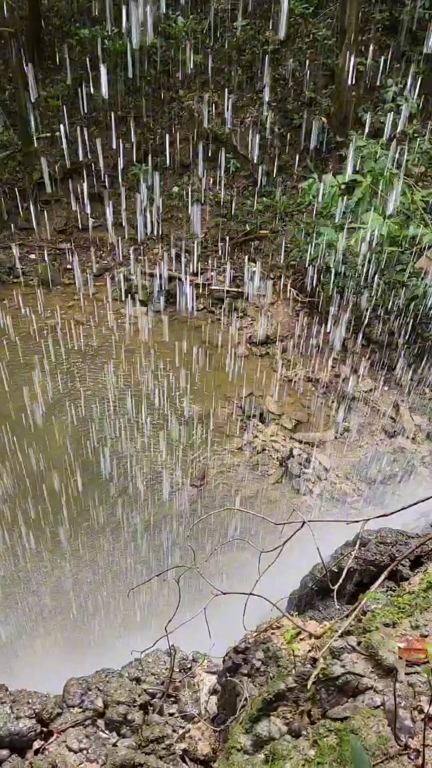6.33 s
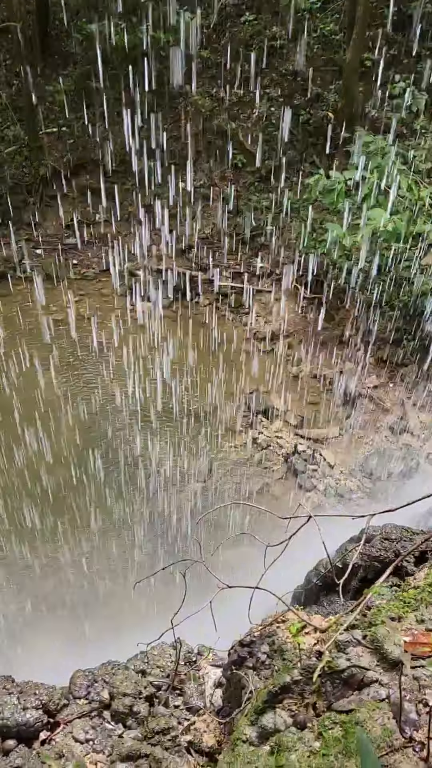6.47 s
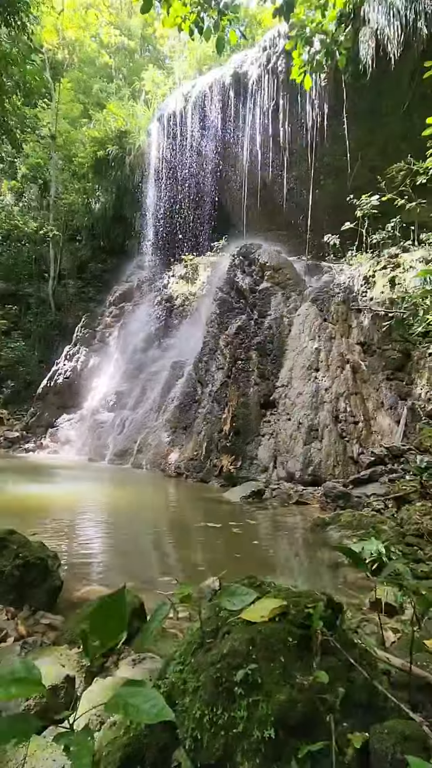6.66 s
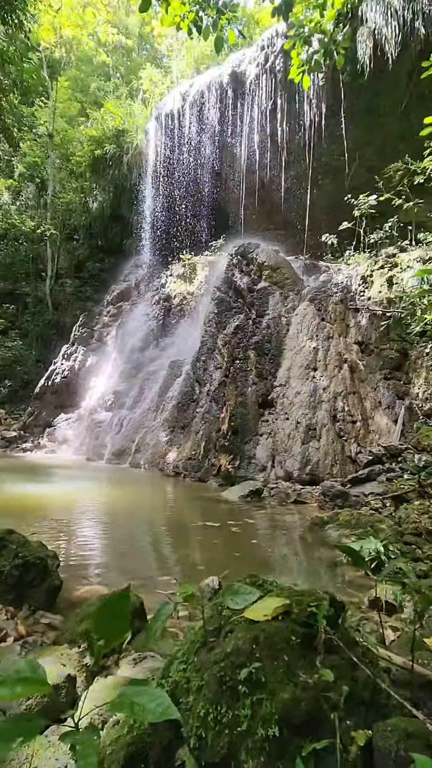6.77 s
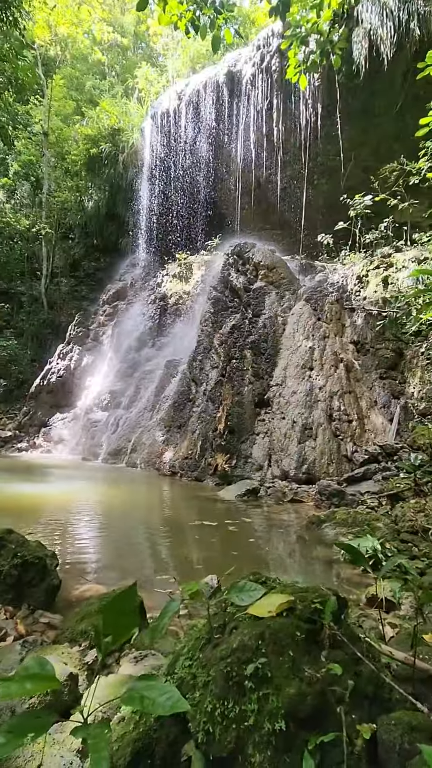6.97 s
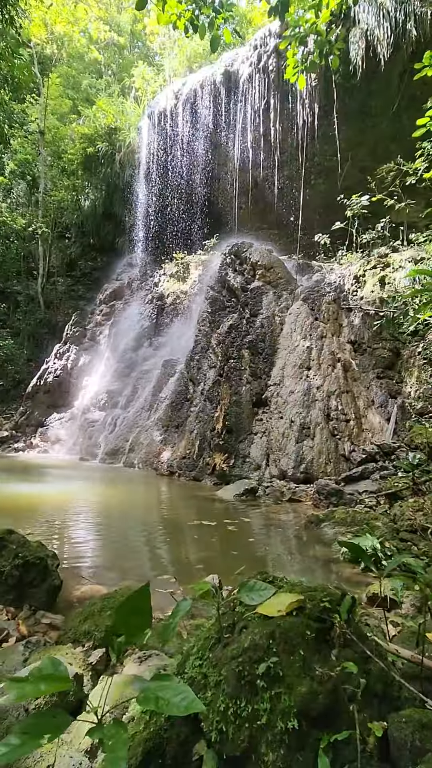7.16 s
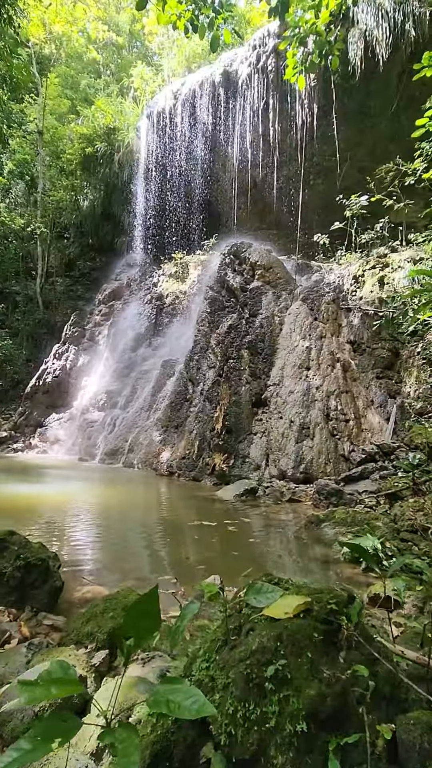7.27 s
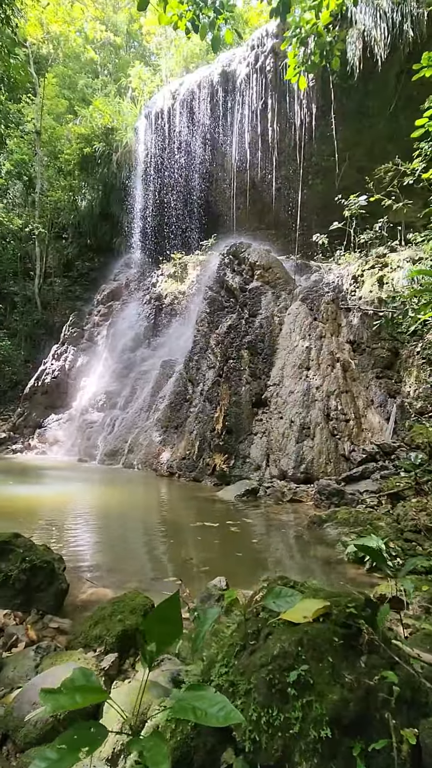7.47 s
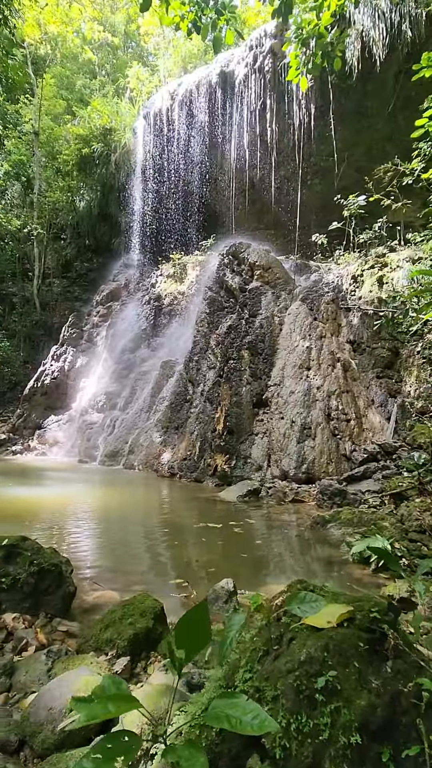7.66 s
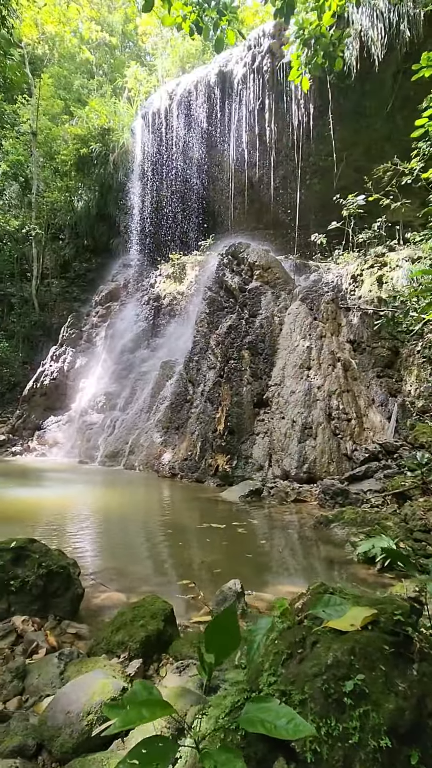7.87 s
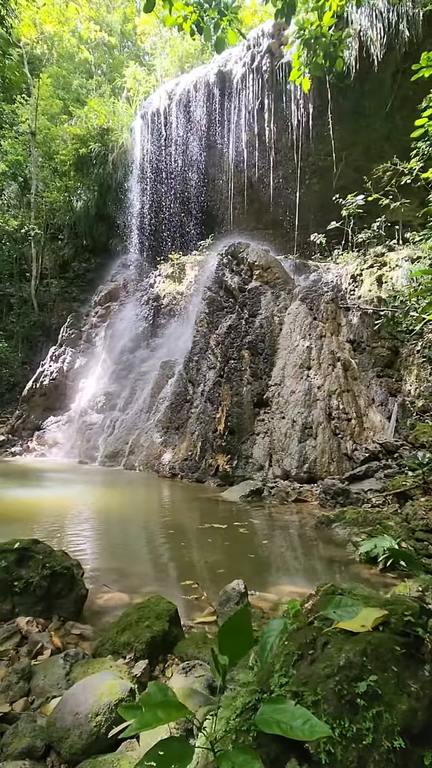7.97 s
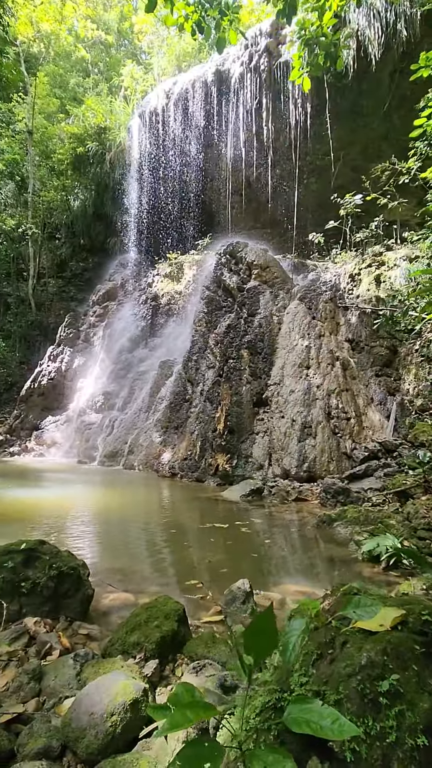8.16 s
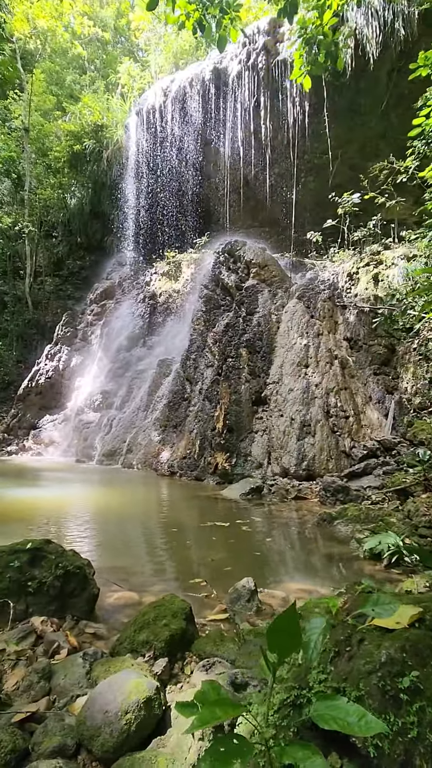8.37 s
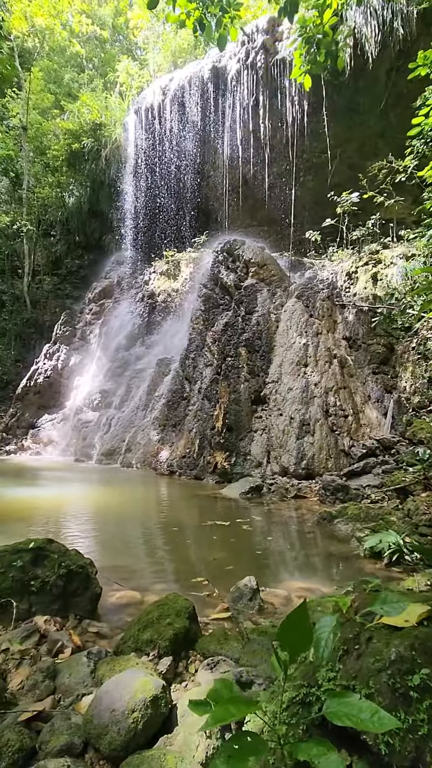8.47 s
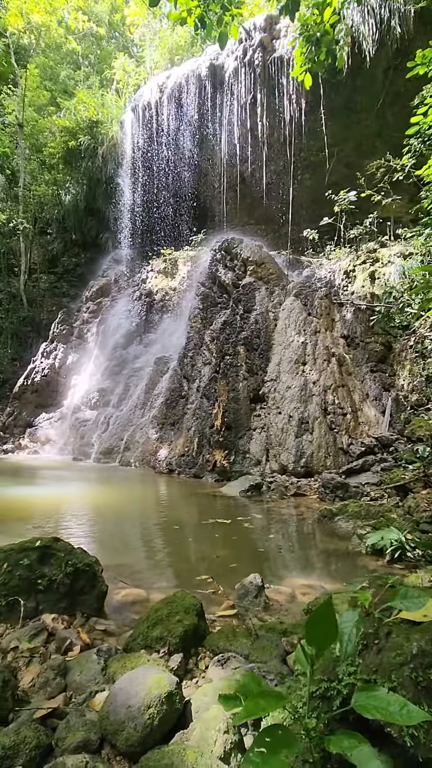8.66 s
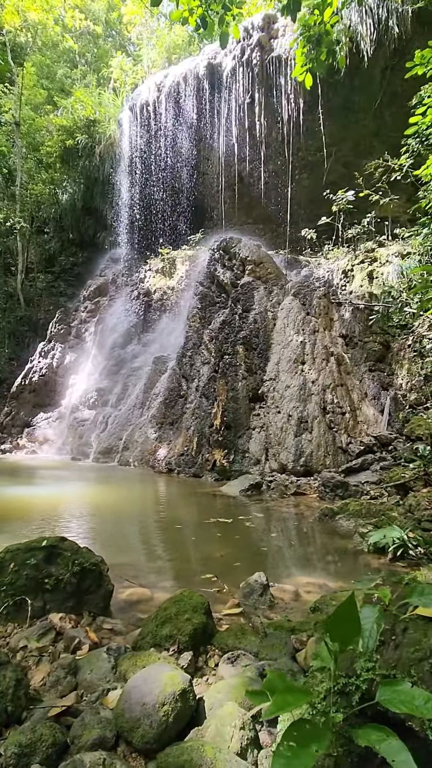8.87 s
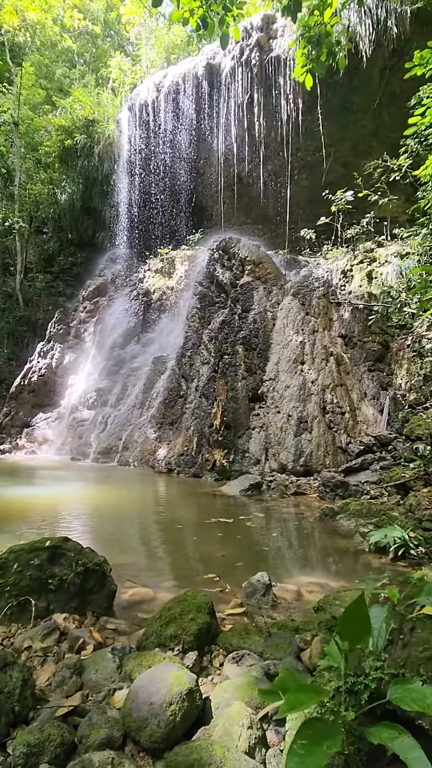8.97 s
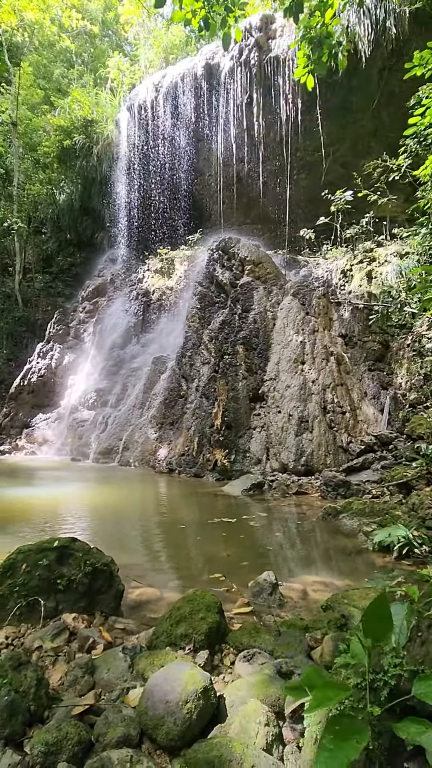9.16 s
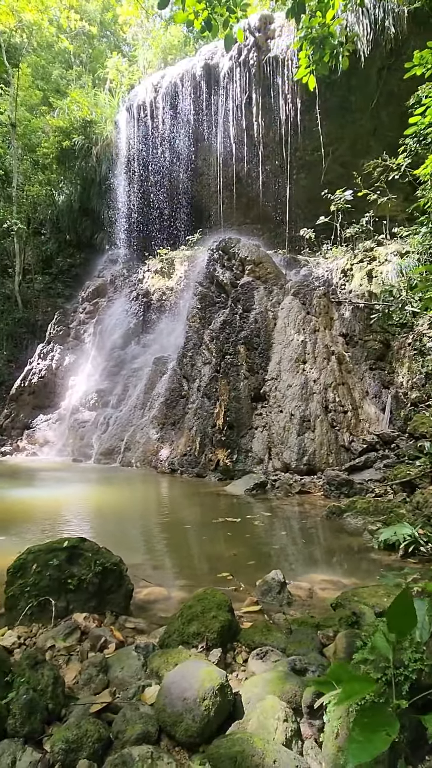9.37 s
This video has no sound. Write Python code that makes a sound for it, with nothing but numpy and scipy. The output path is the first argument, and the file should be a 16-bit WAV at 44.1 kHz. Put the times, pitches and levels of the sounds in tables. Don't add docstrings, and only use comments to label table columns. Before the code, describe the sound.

Outdoor stereo microphone right beside a thin waterfall: steady crackling spray, a thick strand pouring into the pool, random sharp drop impacts, and soft low wind buffeting. The stereo image shifts slowly as the microphone turns early on. Near the end an abrupt cut leaves a tenth of a second of silence, followed by the same fall from across the pool, softer, even and without distinct drops.

```python
import sys
import numpy as np
from scipy import signal
from scipy.fft import rfft, irfft, next_fast_len
from scipy.io import wavfile
from scipy.ndimage import map_coordinates

SR = 44100
rng = np.random.default_rng(int(sys.argv[2]) if len(sys.argv) > 2 else 0)


def dump(signal):
    limited = np.clip(np.atleast_2d(signal).T, -1, 1)
    pcm = np.round(limited * 32767).astype(np.int16)
    wavfile.write(sys.argv[1], SR, pcm)


def decibels_to_gain(level_db):
    exponent = np.asarray(level_db, float) / 20
    return 10 ** exponent


N = 414981
TIME_S = np.arange(N) / SR

# (time [s], level [dB])
NEAR_FLOW = [(0.0, -22), (0.11, -24), (0.6, -22.5), (0.73, -25), (0.9, -22), (3.09, -24), (3.27, -22.5),
             (4.01, -23), (4.67, -22), (5.68, -23.5), (6.32, -22.5), (6.6, -23.5)]
# (time [s], level [dB])
FAR_FLOW = [
    (6.78, -40),
    (7.16, -40),
    (7.57, -40),
    (8.8, -40),
    (9.35, -40),
]
# (frequency [Hz], left-right correlation [-1..1])
NEAR_LIKENESS = [(60, 0.99), (130, 1), (290, 0.94), (640, 0.69), (1410, -0.073), (3100, -0.38),
                 (6820, 0.28), (15000, -0.2)]
# (frequency [Hz], left-right correlation [-1..1])
FAR_LIKENESS = [(60, 1), (130, 1), (290, 0.9), (640, 0.75), (1410, 0.29), (3100, -0.01), (6820, -0.09),
                (15000, 0.07)]
# (frequency [Hz], left density [dB per Hz], right density [dB per Hz])
ROAR_EARLY = [(30, -78, -87), (45, -83, -84), (100, -78, -78.5), (148, -72, -72), (260, -72, -73),
              (400, -71.5, -70.5), (580, -73.5, -75), (720, -72, -73), (1010, -73, -68)]
# (frequency [Hz], left density [dB per Hz], right density [dB per Hz])
HISS_EARLY = [(1420, -70.5, -65), (2220, -66, -62.5), (2900, -66.5, -65), (4030, -64, -62),
              (4700, -68, -53.5), (6200, -66, -51.5), (7540, -59, -51.5), (8100, -67, -58.5),
              (8800, -74, -71.5), (11000, -67, -72), (11800, -66, -59), (13100, -63.5, -59.5),
              (14600, -60.5, -70), (15500, -62, -66)]
# (frequency [Hz], left density [dB per Hz], right density [dB per Hz])
ROAR_LATE = [(29.8, -75, -79), (45, -81, -75), (100, -73.5, -74), (150, -71.5, -72.5), (260, -72, -70.5),
             (418, -71.5, -70.5), (595, -73.5, -72.5), (720, -69, -70.5), (990, -70.5, -69.5)]
# (frequency [Hz], left density [dB per Hz], right density [dB per Hz])
HISS_LATE = [(1420, -68, -64.0), (2270, -67.5, -64.5), (2930, -64, -68.5), (3860, -65.5, -62),
             (5050, -61.5, -53), (6940, -61.5, -51.5), (7560, -57.5, -47.5), (8190, -67, -57.5),
             (9050, -67.5, -73), (11000, -64.5, -72), (11780, -65, -59.5), (13240, -57, -57.5),
             (14600, -61.5, -63.5), (15600, -59.5, -70)]
# (frequency [Hz], left density [dB per Hz], right density [dB per Hz])
ROAR_FAR = [(29.8, -87, -98), (45, -88, -82), (99, -76, -76), (146, -78.0, -78.5), (263, -84.5, -84),
            (453, -79.5, -78.5), (590, -74.5, -77), (720, -77.5, -76), (1000, -75, -75)]
# (frequency [Hz], left density [dB per Hz], right density [dB per Hz])
HISS_FAR = [(1530, -71.5, -70.5), (2150, -69.5, -68.5), (2750, -70.0, -73), (3740, -71, -70.5),
            (4850, -68.0, -65), (6500, -65.5, -64), (7700, -66.5, -60.5), (8120, -70, -66.5),
            (8800, -76, -82), (11100, -73.5, -79), (11760, -69, -71.5), (13100, -68.5, -68),
            (14600, -72, -70), (15600, -67, -80)]
# (time [s], lag of left port [ms])
STRAND_LAG = [
    (0, 0.33),
    (1, 0.33),
    (2, 0.31),
    (3, 0.1),
    (4.5, 0.027),
    (6.6, 0.063),
]
# (time [s], level re hiss [dB], left-right [dB], centre [Hz])
DROPS = [(0.052, 5, 6, 4700), (0.2322, 8, -2, 2000), (0.3927, 5, -2, 2600), (0.409, 4, 0, 1800),
         (0.4744, 6.5, -1, 1900), (0.5961, 4, 0, 4200), (0.7804, 3, -5, 3000), (0.9863, 7, 2, 2900),
         (1.1851, 5, -1, 3100), (1.2129, 8, 0, 2600), (1.4302, 4, -2, 3700), (1.7362, 4.5, 1, 2500),
         (1.8219, 5, -2, 3300), (2.1036, 7, -2, 2600), (2.4008, 6.5, 3, 2500), (3.4247, 7, 6, 5100),
         (3.8624, 4, 4, 2500), (4.2071, 7, 6, 2300), (4.2517, 4.5, 3, 9600), (4.526, 8.5, 5, 3200),
         (4.6795, 3, 6, 3700), (4.808, 3.5, 5, 2700), (5.143, 4.5, 3, 2700), (5.2101, 7, 6, 5000),
         (5.4787, 5, 2, 1800), (5.514, 5, 2, 6700), (5.9363, 6, 4, 6700), (6.0134, 5, 4, 2900),
         (6.1625, 4.5, 1, 2200), (6.5349, 4, 4, 2100)]
# (time [s], peak [dB], left-right [dB])
CRACKS = [(0.048, -23, -3), (0.4303, -6, -13), (0.504, -12.5, -17), (0.561, -19, -9.5), (0.9365, -14, -13),
          (1.2378, -6, -10), (1.288, -11, -6), (1.4282, -12, 1), (1.465, -9, 1), (1.5773, -5.5, 1),
          (1.821, -12, -7), (1.899, -9, -6), (2.0366, -20, -12.0), (2.0609, -4, -9), (2.374, -8.5, -14),
          (2.8846, -20, -8), (3.121, -9, -10), (3.2919, -6.5, -5), (3.423, -14, -21), (3.5588, -10, -11),
          (3.8557, -8, -6), (4.5035, -12, -9), (4.807, -8, -8), (4.93, -5, -4), (5.194, -16, -8),
          (5.209, -21, 1), (5.514, -20, -3), (6.1843, -6, -6), (6.2944, -12, -10), (6.5121, -13, 0)]
# (time [s], peak [dB])
GUSTS = [(0.08, -52), (0.37, -53), (0.72, -55), (0.94, -50), (1.85, -49), (2.38, -53), (2.5, -52),
         (2.64, -50), (2.92, -45.5), (3.22, -47), (3.62, -48), (4.45, -53), (4.93, -47), (5.08, -51),
         (5.34, -51), (5.97, -51), (7.81, -55), (8.15, -54)]

TURN_S = (1.4, 3.04)
NEAR_ENDS_S, FAR_STARTS_S = 6.6045, 6.7036
SURGES_PER_S, SPLASH_FOLLOWS = 2.35, .3
CRACK_OVER_HISS_DB, PORT_BIAS_DB = 10.5, -7
STRAY_DROPS, STRAY_DB, STRAY_HZ = 40, 2, (2000, 5500)
STRAY_PAN_DB, PAN_SPREAD_DB = (-4, 3.5), 2.5
LAG_MS, LAG_SPREAD_MS = (.2, -.4), .35
CALM_DB, GUST_RISE_DB_PER_S, GUST_FALL_DB_PER_S = -63, 112, 110


def rms_one(x):
    return x / np.sqrt(np.mean(x ** 2) + 1e-20)


def in_time(rows):
    time_s, *columns = np.transpose(rows)
    return [np.interp(TIME_S, time_s, column) for column in columns]


def at_hz(rows, hz, column=1):
    rows = np.array(rows)
    return np.interp(np.log(hz + 1), np.log(rows[:, 0]), rows[:, column])


def drift(rate_hz):
    pole = np.exp(-80 * np.pi * rate_hz / SR)
    noise = rng.standard_normal(N // 40 + 2002)
    slow = signal.lfilter([1], [1, -2 * pole, pole * pole], noise)[2000:]
    return np.interp(np.arange(N) / 40, np.arange(len(slow)), rms_one(slow))


def rush(likeness):
    size = next_fast_len(N)
    mid, side = rfft(rng.standard_normal((2, N)), size)
    alike = np.clip(at_hz(likeness, np.linspace(0, SR / 2, len(mid))), -1, 1)
    pair = np.sqrt(1 + alike) * mid + np.sqrt(1 - alike) * side * [[1], [-1]]
    return irfft(pair, size)[:, :N] * np.sqrt(.5)


def strand(low_hz, high_hz):
    pour = rng.standard_normal(N) * decibels_to_gain(2.75 * drift(30))
    pour = signal.sosfilt(signal.butter(1, [low_hz, high_hz], "band", fs=SR, output="sos"), pour)
    read_at = np.arange(N) - in_time(STRAND_LAG)[0] * SR / 1000
    left = map_coordinates(pour, [read_at], order=1, mode="nearest")
    return np.array([left, pour])


def splat(hz, octaves, t60_s, noise):
    edges_hz = np.clip(hz * 2 ** (np.array([-.5, .5]) * octaves), 300, 19000)
    fall = decibels_to_gain(-60 * np.arange(noise.shape[-1]) / SR / t60_s)
    puff = signal.sosfilt(signal.butter(2, edges_hz, "band", fs=SR, output="sos"), noise * fall)
    return puff * np.sqrt(np.sum(fall ** 2) / np.sum(puff ** 2, axis=-1, keepdims=True))


def patter(per_s, spread_db, clump_db, turns, octaves):
    sizes = decibels_to_gain(spread_db * np.minimum(rng.exponential(1, N), 3.2))
    chance = per_s * decibels_to_gain(clump_db * drift(14)) / SR
    landed = sizes * (rng.random(N) < chance)
    spot = rng.integers(0, 12, N)
    size = next_fast_len(N + 900)
    spectrum = 0
    for k, hz in enumerate(np.geomspace(1200, 13000, 12)):
        lag, pan_db = int(rng.uniform(0, 40)), rng.normal(0, 1.97)
        sound = splat(hz, octaves, 0.0025 + turns / hz, rng.standard_normal((2, 900)))
        sound = sound * decibels_to_gain([[pan_db], [-pan_db]])
        sound[k % 2] = np.r_[np.zeros(lag), sound[k % 2, :900 - lag]]
        spectrum = spectrum + rfft(landed * (spot == k), size) * rfft(sound, size) * np.sqrt(hz / 4000)
    return rms_one(irfft(spectrum, size)[:, :N])


def surging(water, flow, surge_db, during):
    spray_db = in_time(flow)[0]
    spray_db = spray_db - spray_db[during].mean() + surge_db * drift(SURGES_PER_S)
    splash_db = (SPLASH_FOLLOWS - 1) * spray_db + surge_db * drift(SURGES_PER_S)
    splash = signal.sosfilt(signal.butter(1, 3600, fs=SR, output="sos"), water)
    return (water + (decibels_to_gain(splash_db) - 1) * splash) * decibels_to_gain(spray_db)


def stray_drops():
    when, size, pitch, side = rng.random((STRAY_DROPS, 4)).T
    time_s = when * NEAR_ENDS_S
    level_db = STRAY_DB + 3 * (size - .5)
    pan_db = np.interp(time_s, TURN_S, STRAY_PAN_DB) + PAN_SPREAD_DB * 2 * (2 * side - 1)
    hz = STRAY_HZ[0] * (STRAY_HZ[1] / STRAY_HZ[0]) ** pitch
    return list(zip(time_s, level_db, pan_db, hz))


def fat_drops(boost_db, t60_s, octaves, spray_db):
    cracks = [(time_s + .0012, db + CRACK_OVER_HISS_DB, pan_db - PORT_BIAS_DB, 6200)
              for time_s, db, pan_db in CRACKS]
    drops = DROPS + cracks + stray_drops()
    out = np.zeros((2, N + 1800))
    noise = rng.standard_normal((len(drops), 2, 2, 1800))
    noise[:, 0, :, 0] = 5
    for (time_s, db, pan_db, hz), (crack, spray) in zip(drops, noise):
        lag_ms = np.interp(time_s, TURN_S, LAG_MS) + LAG_SPREAD_MS * spray[0, -1]
        sound = splat(hz, octaves, t60_s, crack) + decibels_to_gain(spray_db) * splat(hz, 1.5, .04, spray)
        for side, sign in enumerate([.5, -.5]):
            at = max(round((time_s + sign * lag_ms / 1000 - .0003) * SR), 0)
            gain = decibels_to_gain(db + sign * pan_db + boost_db) * (hz / 3500) ** 0.3
            out[side, at:at + 1800] += gain * sound[side]
    return out[:, :N]


def through_ports(white, rows):
    hz = np.arange(2049) * SR / 4096
    out = []
    for side in (0, 1):
        gain = decibels_to_gain(at_hz(rows, hz, column=1 + side)) * np.sqrt(SR / 2)
        cepstrum = irfft(np.log(gain))
        cepstrum[1:2048] *= 2
        impulse = irfft(np.exp(rfft(cepstrum[:2049], 4096)))
        out.append(signal.oaconvolve(white[side], impulse)[:N])
    return np.array(out)


def near_curtain():
    water = decibels_to_gain(-3) * rush(NEAR_LIKENESS) + decibels_to_gain(-5.5) * strand(low_hz=690, high_hz=3270)
    water += decibels_to_gain(-7.5) * patter(per_s=2500, spread_db=4.5, clump_db=2.5, turns=8.2, octaves=2.03)
    water += decibels_to_gain(-18.5) * patter(per_s=170, spread_db=-0.5, clump_db=6.5, turns=6.2, octaves=2.2)
    water = surging(water, NEAR_FLOW, surge_db=0.66, during=slice(0, int(NEAR_ENDS_S * SR)))
    water += fat_drops(boost_db=2.5, t60_s=0.0098, octaves=1.62, spray_db=-10.5)
    late = np.interp(TIME_S, TURN_S, [0, 1])
    early_aim = through_ports(water, ROAR_EARLY + HISS_EARLY)
    late_aim = through_ports(water, ROAR_LATE + HISS_LATE)
    return (1 - late) * early_aim + late * late_aim


def breeze():
    common, own = rng.standard_normal(N), rng.standard_normal((2, N))
    band = signal.butter(2, [33, 72], "band", fs=SR, output="sos")
    lumps = signal.sosfilt(band, common + 0.42 * own)
    gusts = np.array(GUSTS)
    since_s = TIME_S - gusts[:, :1]
    puffs_db = gusts[:, 1:] + np.minimum(GUST_RISE_DB_PER_S * since_s, -GUST_FALL_DB_PER_S * since_s)
    return decibels_to_gain(np.maximum(puffs_db.max(axis=0), CALM_DB)) * rms_one(lumps)


def microphone(x):
    rounded = .82 * np.tanh(x / .82)
    return signal.sosfilt(signal.ellip(14, .3, 60, 15725, fs=SR, output="sos"), rounded)


def far_fall():
    water = rush(FAR_LIKENESS) * decibels_to_gain(0.2 * drift(15) + 0.37 * drift(60))
    water = surging(water, FAR_FLOW, surge_db=0.26, during=slice(int(FAR_STARTS_S * SR), N))
    return through_ports(water, ROAR_FAR + HISS_FAR)


def scene():
    wind = breeze()
    fade_db = np.interp(TIME_S - NEAR_ENDS_S, [0, .0003, .009, .013, .034, .036],
                        [0, -14, -28, -50, -68, -200])
    near = decibels_to_gain(fade_db) * microphone(near_curtain() + wind)
    far = (TIME_S >= FAR_STARTS_S) * microphone(far_fall() + wind)
    return near + far


def roll_off(x):
    return signal.sosfilt(signal.butter(12, 16510, fs=SR, output="sos"), x)


def record(dry):
    return roll_off(dry)


dry = scene()
out = record(dry)
dump(out)
```